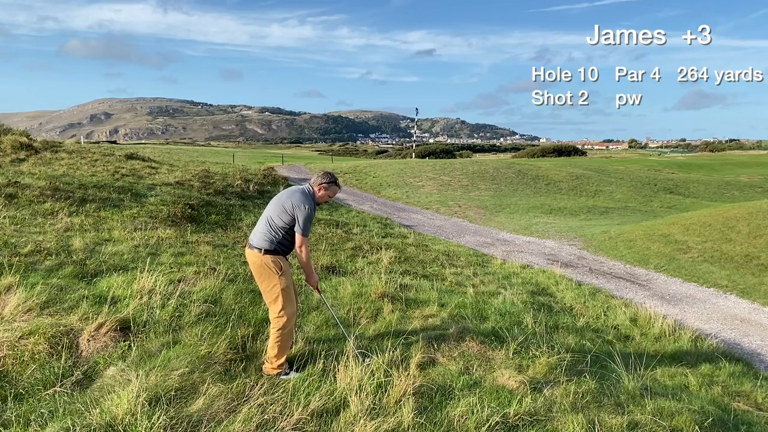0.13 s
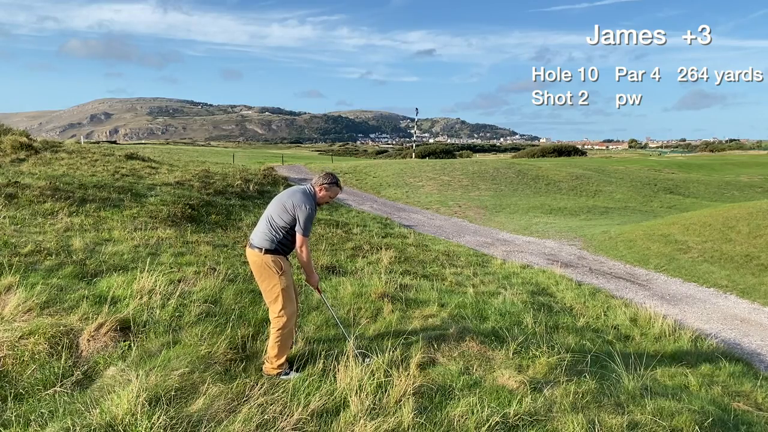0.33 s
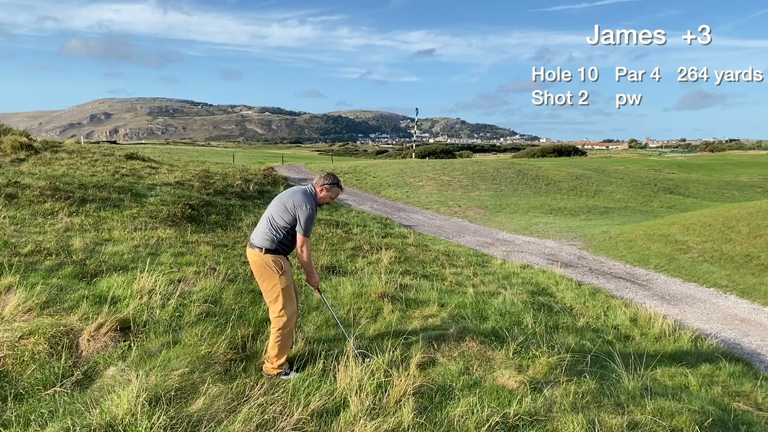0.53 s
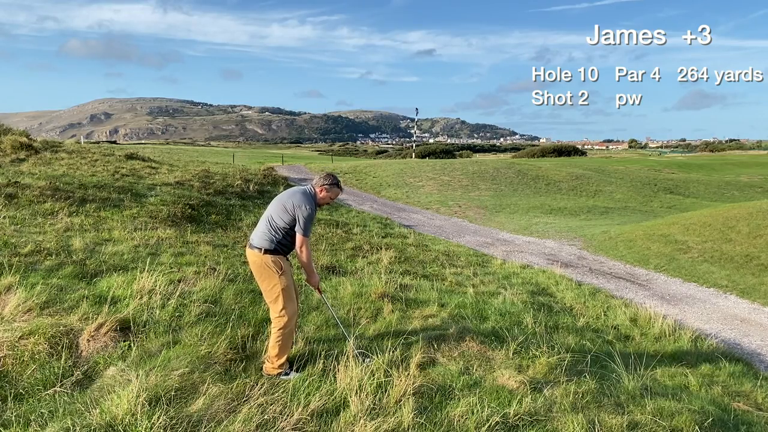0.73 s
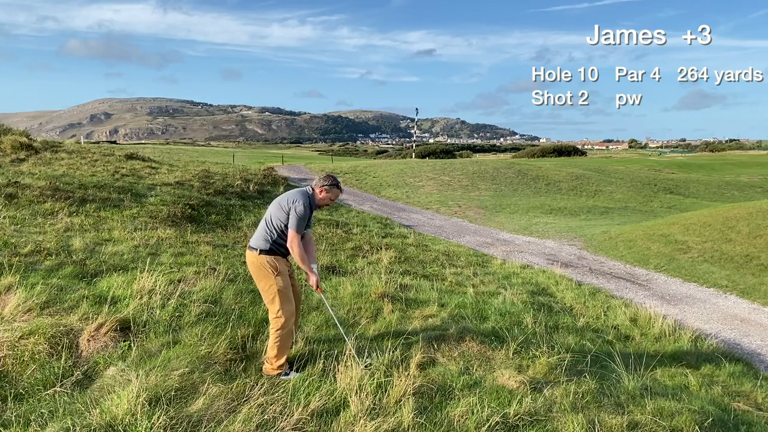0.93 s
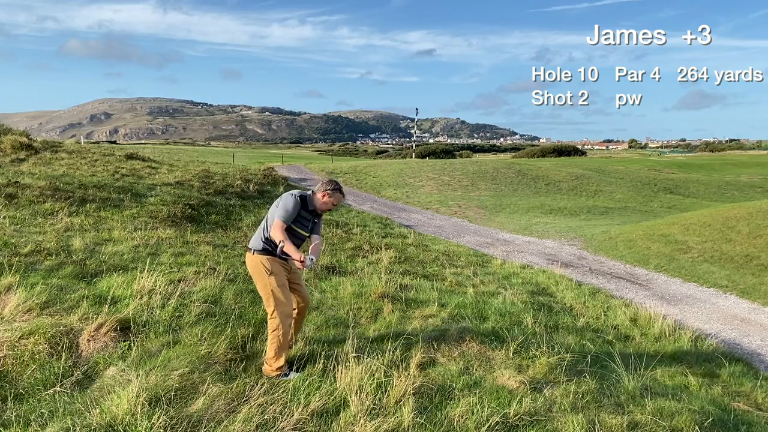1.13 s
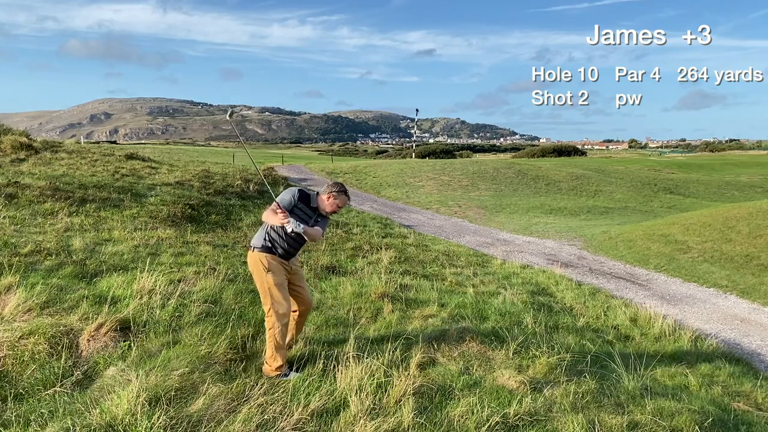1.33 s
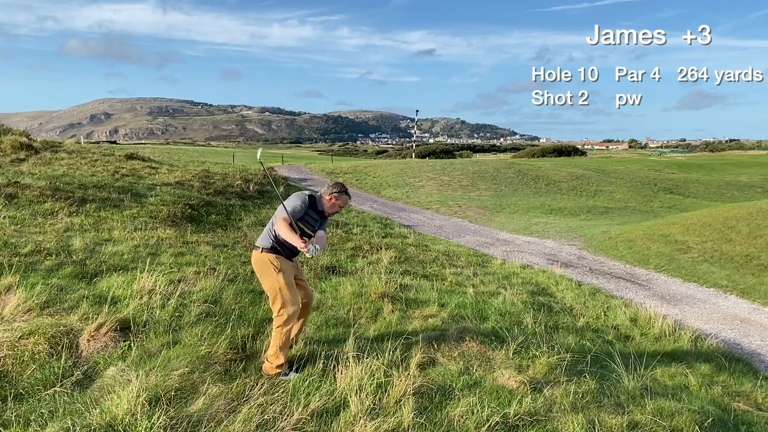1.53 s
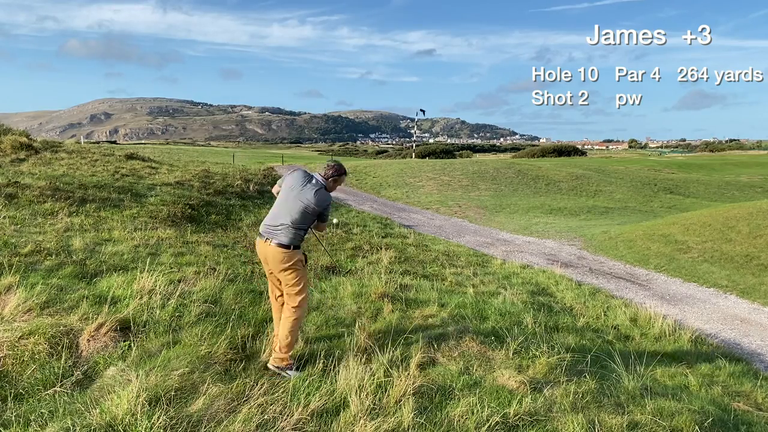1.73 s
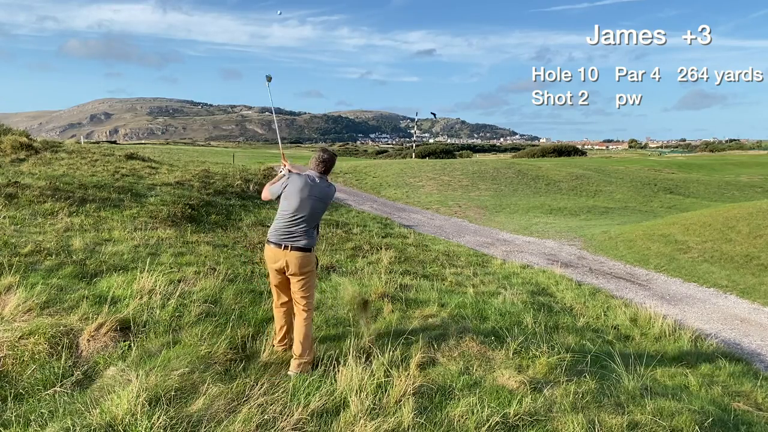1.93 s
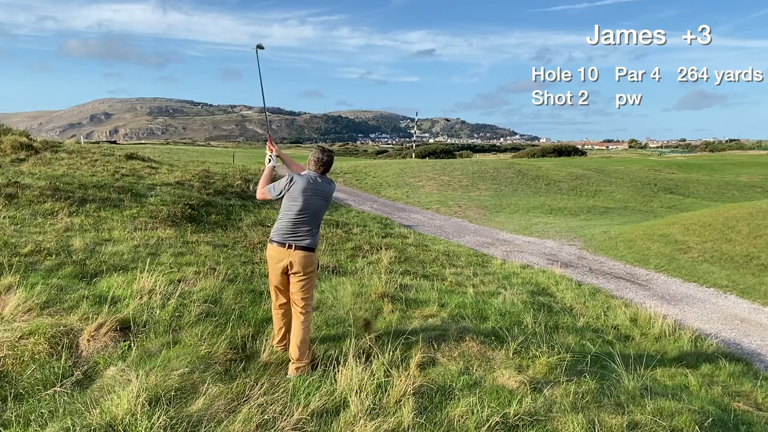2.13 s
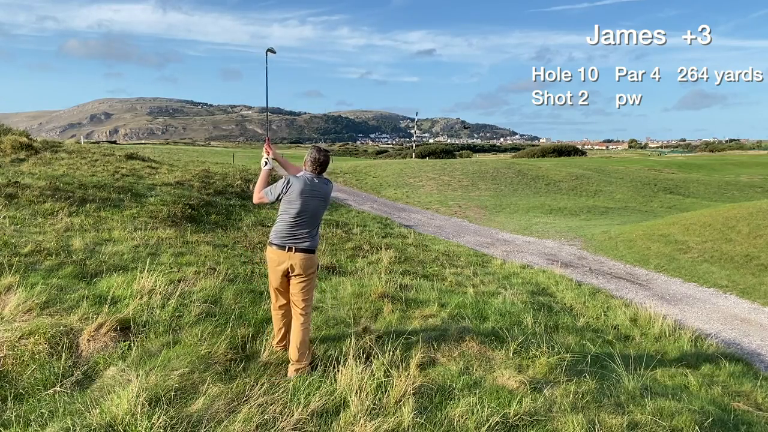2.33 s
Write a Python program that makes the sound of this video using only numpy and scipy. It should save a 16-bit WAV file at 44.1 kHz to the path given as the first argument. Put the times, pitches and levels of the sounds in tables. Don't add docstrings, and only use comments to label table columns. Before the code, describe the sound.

One hard golf shot from thick rough, a dry click and grass tear over quiet open air.

```python
import sys
import numpy as np
from scipy import signal
from scipy.fft import rfft, irfft, next_fast_len
from scipy.io import wavfile
from scipy.ndimage import uniform_filter1d, map_coordinates

SR = 44100
rng = np.random.default_rng(int(sys.argv[2]) if len(sys.argv) > 2 else 0)


def invert_db(x):
    u = np.asarray(x, float) / 20
    return 10 ** u


def generate_wav(sig):
    pcm = np.round(np.clip(np.atleast_2d(sig).T, -1, 1) * 32767).astype(np.int16)
    wavfile.write(sys.argv[1], SR, pcm)


N = 109323


def unit(x):
    return x / np.sqrt(np.mean(x ** 2) + 1e-20)


def level(rows, outside_db=-130):
    s, db = np.transpose(rows)
    return invert_db(np.interp(np.arange(N) / SR, s, db, outside_db, outside_db))


def wobble(rate):
    knots = rng.standard_normal(int(N * rate / SR) + 4)
    return map_coordinates(knots, [np.arange(N) * rate / SR])


def coloured(x, points):
    f, db = np.transpose(points)
    size = next_fast_len(N + 8192)
    hz = np.fft.rfftfreq(size, 1 / SR)
    gain = invert_db(np.interp(np.log(hz + 1), np.log(f + 1), db, -120, -120))
    return unit(irfft(rfft(x, size) * gain, size)[:N])


def noise(points):
    return coloured(rng.standard_normal(N), points)


def puff(s, db, half_s, points):
    swell = np.exp(-((np.arange(N) / SR - s) / half_s) ** 2)
    return invert_db(db) * swell * noise(points)


def crackle(per_s, spread_db, bed):
    hit = rng.random(N) < per_s / SR
    size = invert_db(spread_db * rng.exponential(size=N))
    breaks = hit * np.clip(rng.standard_normal(N) * size, -3, 3)
    return unit(breaks) + bed * rng.standard_normal(N)


def add(x, s, sound):
    x[round(s * SR):][:len(sound)] += sound


# f [Hz], level [dB per Hz]
ROAD = [(76, -35.5), (130, -15.5), (163, -9.5), (406, -6), (516, -7.5), (559, -7.5), (848, -1),
        (2410, -21.5), (6000, -40), (7800, -61.5), (13200, -120)]
# t [s], level [dB]
ROAD_LEVEL = [(0.0, -64), (0.67, -64), (0.94, -65), (1.82, -64), (2.14, -66), (2.48, -63.5)]


def distant_road():
    z = signal.stft(rng.standard_normal(N + 512), nperseg=512)[2]
    field = uniform_filter1d(rng.standard_normal(z.shape), 5, 0)
    field = uniform_filter1d(field, 10, 1)
    patchy = signal.istft(z * invert_db(unit(field)), nperseg=512)[1][:N]
    return level(ROAD_LEVEL, -64) * invert_db(0.6 * wobble(6)) * coloured(patchy, ROAD)


# f [Hz], level [dB per Hz]
RUMBLE = [(14, -31.5), (22, -1), (36, -0.5), (62, -6), (92, -10), (125, -18.5), (170, -35)]
# t [s], level [dB]
RUMBLE_LEVEL = [(0.0, -66), (0.09, -64), (0.69, -68), (0.82, -68.5), (1.21, -68.5), (1.84, -63.5),
                (2.17, -66.5), (2.48, -69.5)]


def rumble_and_drone():
    drone_hz, width_hz = 57.2, 12
    band = [(drone_hz - width_hz, -20), (drone_hz, 0), (drone_hz + width_hz, -20)]
    rumble = invert_db(3.3 * wobble(1.3)) * noise(RUMBLE)
    return level(RUMBLE_LEVEL, -64) * (rumble + noise(band))


# t [s], pressure [full scale], half length [s]
GUSTS = [(.02, -0.0047, 0.039), (.16, 0.0046, 0.068), (.27, -0.0036, 0.027), (.38, .012, 0.071),
         (.58, -0.0053, 0.093), (.77, 0.00082, .06), (1., -0.0027, .12), (1.4, -.0017, 0.12),
         (1.6, .003, 0.094), (1.76, -0.002, 0.11), (1.98, 0.0033, 0.083), (2.25, -0.00035, .06),
         (2.45, -0.011, .11)]


def gusts():
    t = np.arange(N) / SR
    return sum(size * np.exp(-((t - s) / half) ** 2) for s, size, half in GUSTS)


# t [s], peak level [dB], f [Hz], t60 [s]
SNAPS = [(.665, -68, 9000, .003), (.874, -64, 6000, .003), (.936, -61, 6000, .003), (.975, -60, 5500, .003),
         (.982, -60, 8500, .003), (1.008, -58, 9500, .003), (1.015, -60, 10500, .003),
         (1.03, -61, 10500, .003), (1.7246, -19, 2900, .004), (1.7325, -24, 3500, .003),
         (1.7348, -24, 8000, .003), (1.7368, -17, 4800, .002), (1.7376, -20, 7500, .002),
         (1.7417, -22, 1500, .003), (1.7505, -29, 8500, .003), (1.829, -57, 2600, .004),
         (1.8666, -47, 1600, .005), (1.92, -58, 1700, .004), (2.0, -66, 6000, .003)]


def snaps():
    x, t = np.zeros(N), np.arange(SR // 8) / SR
    for s, db, hz, t60 in SNAPS:
        upper_hz = hz * rng.uniform(1.3, 1.6)
        pair = np.sin(2 * np.pi * hz * t) + 0.7 * np.sin(2 * np.pi * upper_hz * t)
        onset = 1 - np.exp(-t * hz * 2)
        add(x, s, invert_db(db - 60 * t / t60) * pair * onset)
    return x


# t [s], level [dB]
TAKEAWAY = [
    (.855, -78),
    (.872, -72.5),
    (.945, -68.5),
    (.962, -71),
    (.98, -65.5),
    (1.03, -69),
    (1.058, -70.5),
    (1.09, -82),
]
# f [Hz], level [dB per Hz]
BRUSH = [(1000, -31), (2200, -6), (3500, -2.5), (6000, 0), (9200, 1), (12500, -2.5), (15700, -6)]


def takeaway():
    return level(TAKEAWAY) * invert_db(0.8 * wobble(60)) * coloured(crackle(1500, 3.5, 0.77), BRUSH)


# f [Hz], level [dB per Hz]
SHOE = [(90, -27), (200, -10), (330, 1), (550, -16), (2000, -30), (3500, -24), (6000, -32)]


def weight_shift():
    return puff(1.595, -65.5, 0.019, SHOE)


# t [s], level [dB]
DOWNSWING = [
    (1.635, -89),
    (1.665, -64.5),
    (1.69, -58),
    (1.705, -55),
    (1.72, -51),
    (1.74, -64),
]
# f [Hz], level [dB per Hz]
SHAFT_AIR = [(150, -17), (350, 5.5), (1000, 1), (3000, -3.5), (6000, -14.5), (10000, -35)]


def whoosh():
    return level(DOWNSWING) * invert_db(1.5 * wobble(50)) * noise(SHAFT_AIR)


# t [s], level [dB]
TEAR = [
    (1.7085, -62),
    (1.711, -48),
    (1.720, -39),
    (1.730, -31),
    (1.7375, -25),
    (1.7405, -31),
    (1.7505, -33.5),
    (1.755, -41),
    (1.785, -64),
]
# f [Hz], level [dB per Hz]
CUT = [(30, -32.5), (60, -4.5), (160, -9), (500, -4), (2100, -3.5), (4400, -2.5), (7500, -0.5),
       (15700, -9.5)]


def tear():
    return level(TEAR) * invert_db(2.0 * wobble(500)) * coloured(crackle(7000, 2, 1.3), CUT)


# f [Hz], level [dB], t60 [s]
BALL = [
    (1118, 1, 0.0055),
    (1760, -8.5, 0.011),
    (3200, -4, 0.0043),
    (930, -18, 0.012),
    (660, -14.5, 0.0077),
    (164, -29, 0.055),
]


def ball_knock():
    x, t = np.zeros(N), np.arange(SR // 8) / SR
    ring = sum(invert_db(db - 60 * t / t60) * np.sin(2 * np.pi * hz * t) for hz, db, t60 in BALL)
    contact = 1 - np.exp(-t / 0.0003)
    add(x, 1.73758, -invert_db(-11.5) * ring * contact)
    return x


# t [s], level [dB]
DEBRIS = [
    (1.76, -80),
    (1.79, -63.5),
    (1.815, -67.5),
    (1.87, -63.5),
    (1.926, -64),
    (1.94, -78),
    (2.0, -78),
    (2.1, -83),
]
# f [Hz], level [dB per Hz]
FALL = [(700, -32), (1500, -1), (2500, 1.5), (6000, -1), (10600, -3.5), (15700, -10.5)]
# f [Hz], level [dB per Hz]
LOW_BAND = [(300, -22.5), (500, -4), (1000, -7.5), (1450, 1.5), (2400, -10), (3500, -20)]


def debris():
    fall = level(DEBRIS) * invert_db(1.1 * wobble(70)) * coloured(crackle(1200, 3.5, 0.81), FALL)
    return fall + puff(1.885, -61.5, 0.057, LOW_BAND)


# t [s], peak level [dB], f [Hz], half length [s]
RETURNS = [
    (2.326, -54.5, 630, 0.0042),
    (2.341, -53, 1420, .004),
    (2.356, -56.5, 1450, 0.0059),
    (2.364, -51.5, 985, 0.0065),
    (2.374, -62, 1580, .004),
    (2.39, -68, 222, .012),
    (2.391, -61, 980, 0.0045),
    (2.395, -69, 700, .008),
]
# f [Hz], level [dB per Hz]
SLOPE = [(400, -22.5), (700, 0), (1000, -7), (1450, 5), (1900, -18), (3000, -20)]


def slopes():
    t = np.arange(N) / SR
    blips = np.zeros(N)
    for s, db, hz, half in RETURNS:
        swell = np.exp(-((t - s) / half) ** 2)
        blips += invert_db(db) * swell * np.sin(2 * np.pi * hz * t)
    return blips * invert_db(3.5 * wobble(330)) + puff(2.365, -63.5, 0.031, SLOPE)


def scene():
    background = distant_road() + rumble_and_drone() + gusts()
    swing = snaps() + takeaway() + weight_shift() + whoosh()
    strike = tear() + ball_knock() + debris() + slopes()
    return (background + swing + strike)[None]


def roll_off(x):
    return signal.sosfilt(signal.butter(12, 15730, fs=SR, output="sos"), x)


# f [Hz], level [dB per Hz]
HISS = [(1760, -30.5), (3000, -6.5), (6490, -3), (12800, -4.5), (15600, -4.5)]


def record(dry):
    hiss_db, top_hz = -81.5, 15780
    x = dry + invert_db(hiss_db) * noise(HISS)
    passed = np.fft.rfftfreq(2 * N, 1 / SR) < top_hz
    mix = irfft(rfft(x, 2 * N) * passed, 2 * N)[:, :N]
    return roll_off(mix)


dry = scene()
out = record(dry)
generate_wav(out)
```